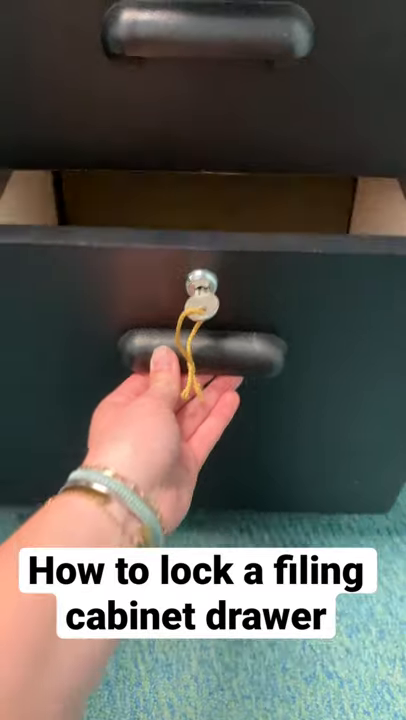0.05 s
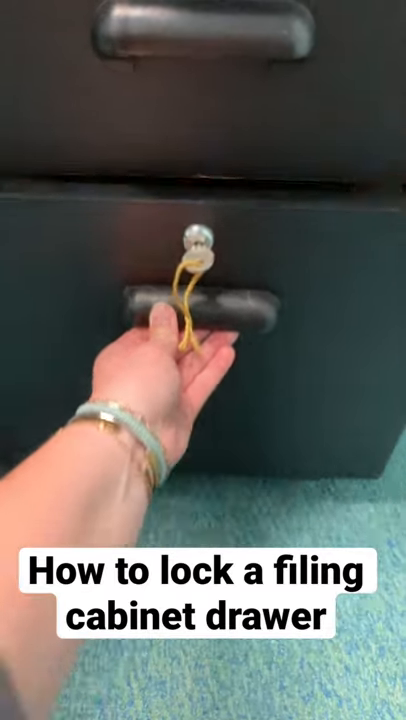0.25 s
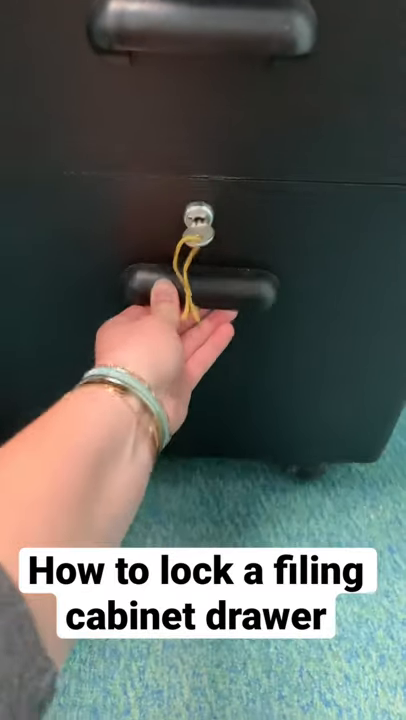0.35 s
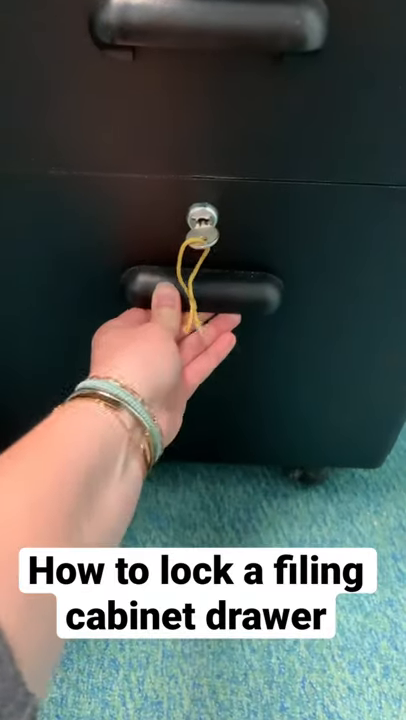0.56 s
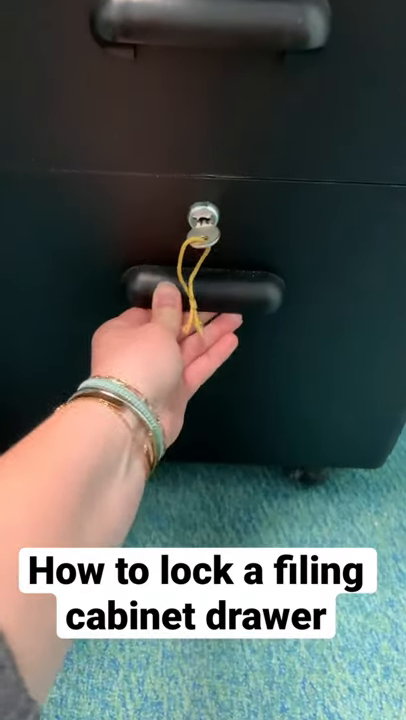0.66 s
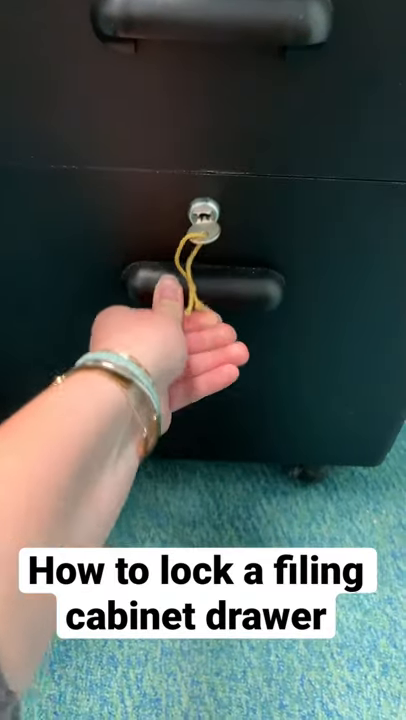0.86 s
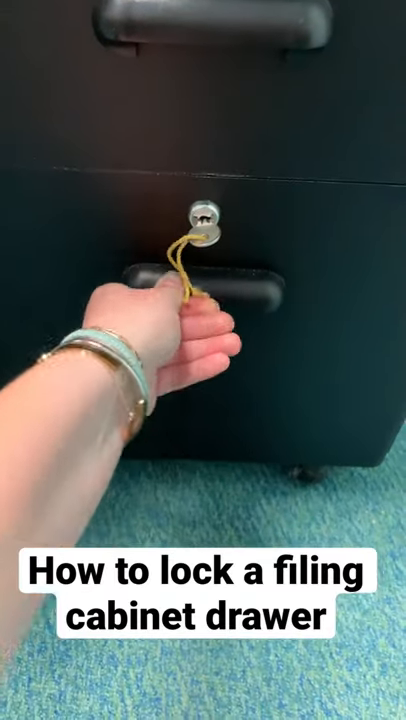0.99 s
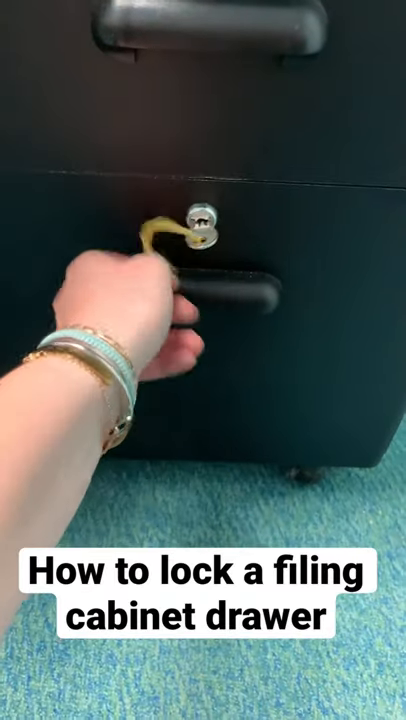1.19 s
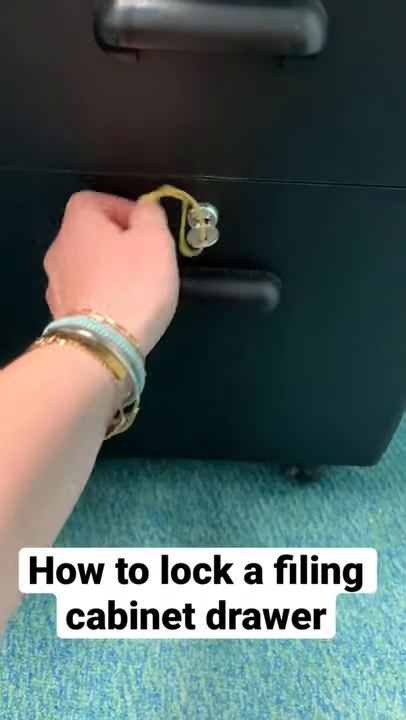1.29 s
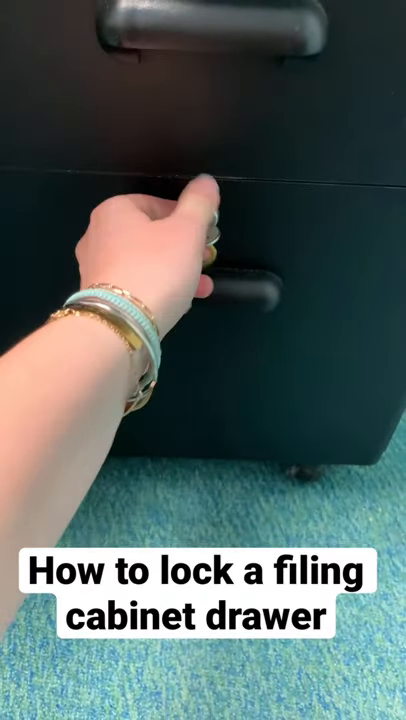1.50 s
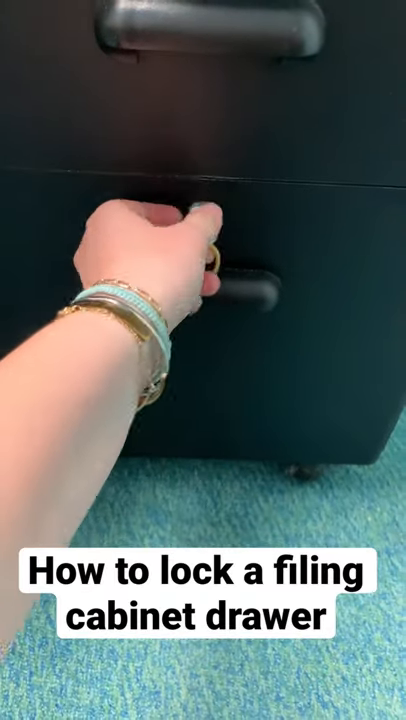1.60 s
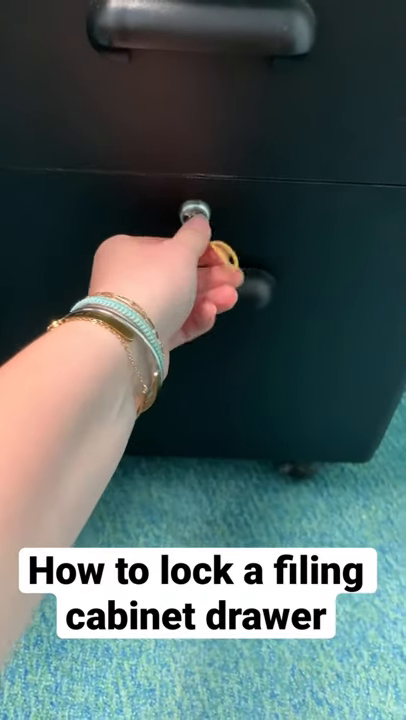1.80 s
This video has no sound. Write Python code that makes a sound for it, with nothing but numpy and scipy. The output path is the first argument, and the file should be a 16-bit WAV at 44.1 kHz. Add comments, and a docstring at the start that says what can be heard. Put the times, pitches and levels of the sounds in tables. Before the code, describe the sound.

Close stereo pickup in a quiet carpeted room: a short drawer rumble, a loud sheet-metal slam, low handling bumps and a tiny squeak, then a faint key jingle and gritty lock clicks.

```python
"""A quiet carpeted office, close to a sheet-metal cabinet, two microphone ports.
A drawer rolls shut (dense grains through box and panels) and slams; the cabinet booms and dies away.
The hand rumbles, rubs and slips off the handle with squeaks; knuckles bump the panel.
A key chinks on its ring (very high modes), then turns the lock with small gritty clicks.
Air handling hisses underneath; a short dull room tail follows every source."""
import sys
import numpy as np
from scipy import signal
from scipy.fft import rfft, irfft, next_fast_len
from scipy.io import wavfile
from scipy.ndimage import uniform_filter1d

SR = 44100
rng = np.random.default_rng(int(sys.argv[2]) if len(sys.argv) > 2 else 0)


def master_out(mix):
    """Clip the mix to full scale and print it as 16-bit PCM to the path in sys.argv[1]."""
    frames = np.transpose(np.atleast_2d(mix))
    ceiling = np.clip(frames, -1, 1)
    pcm = np.round(ceiling * 32767).astype(np.int16)
    wavfile.write(sys.argv[1], SR, pcm)


N = 81585  # length in samples

# cabinet panel modes: (frequency [Hz], level [dB], t60 [s])
CABINET_MODES = [(154, -15, .35), (182, -3.5, 0.15), (239, -8.5, 0.29), (285, -1.5, 0.056),
                 (314.2, -4, 0.05), (347.2, -10.5, 0.16), (416, -24.5, 0.45), (498, -2, 0.083),
                 (587.7, -16, 0.2), (700, -20.5, .1), (773, -13.5, 0.35), (871, -19, 0.07),
                 (1170, -28.5, 0.059), (1380, -27.5, 0.05)]
# drawer front knocking on the frame:
# (time [s], panels [dB], runners [dB], crash below the split [dB], crash above it [dB])
SLAM_KNOCKS = [(0.287, -47, -37.5, -42, -34), (0.296, -45.5, -36, -34, -34.5),
               (.300, -32, -26.5, -22.5, -19), (.304, -24, -33, -31.5, -25), (0.316, -34, -40, -40.5, -29),
               (.323, -21.5, -58, -38, -32.5), (0.342, -32.5, -40, -24, -38),
               (0.347, -31, -62.5, -30, -35.5), (0.362, -28.5, -53.5, -45, -47),
               (0.373, -40, -78, -60, -48), (.399, -36, -67, -53, -56.5), (.42, -51, -84, -45.5, -61)]
BOOM_HZ = 63.08  # whole cabinet rocking on its castors
KNOCK_T60_S = 0.1  # hollow panel knocks, from knuckles and lock


def undb(db):
    """Decibels to gain."""
    return 10 ** (np.asarray(db, float) / 20)


def unit(x):
    """Scale to rms 1."""
    return x / np.sqrt(np.mean(x ** 2))


def curve(rows, column=1):
    """Gain from a (time [s], level [dB]) table, at -120 dB outside it."""
    rows = np.array(rows)
    level_db = np.interp(np.arange(N) / SR, rows[:, 0], rows[:, column], left=-120, right=-120)
    return undb(level_db)


def over_hz(points):
    """A (frequency [Hz], value) table read at every FFT bin, on a log frequency axis."""
    points = np.array(points)
    bins_hz = np.arange(N // 2 + 1) * SR / N
    return np.interp(np.log(bins_hz + 1), np.log(points[:, 0]), points[:, 1])


def colour(x, points):
    """Shape a noise to a spectrum, rms 1."""
    return unit(irfft(rfft(x) * undb(over_hz(points)), N))


def highpass(x, hz):
    """Steep bass cut."""
    return signal.sosfilt(signal.butter(3, hz, "high", fs=SR, output="sos"), x)


def lowpass(x, hz):
    """Steep treble cut."""
    return signal.sosfilt(signal.butter(3, hz, fs=SR, output="sos"), x)


def dull(x, hz):
    """Treble cut, then rms 1."""
    return unit(lowpass(x, hz))


def band(hz, width_hz):
    """Noise in one resonance, rms 1."""
    return unit(signal.lfilter(*signal.iirpeak(hz, hz / width_hz, SR), rng.standard_normal(N)))


def even(x):
    """Noise with its random swells partly flattened, rms 1."""
    evenness = 0.53  # share of the noise's random swells that is flattened, for a steadier rumble
    swell = np.abs(signal.hilbert(x, next_fast_len(N))[:N])
    return unit(x / (swell + .1) ** evenness)


def ring(x, modes):
    """Decaying sines struck by x; a unit impulse gives each about its dB as peak."""
    out = 0
    for hz, db, t60 in modes:
        decay = np.log(1000) / (max(t60, .004) * SR)
        pole = np.exp(2j * np.pi * hz / SR - decay)
        out = out + undb(db) * signal.lfilter([1], [1, -pole], x).imag
    return out


def blows(times, db, push_s):
    """A smooth push at each time, its area set by the level."""
    x = np.zeros(N)
    np.add.at(x, (np.array(times) * SR).astype(int), undb(db))
    push = np.hanning(int(push_s * SR) + 3)
    return np.convolve(x, push / push.sum())[:N]


def bursts(times, db, length_s):
    """A short rattle of contacts at each time, rising fast and fading, its energy set by the level."""
    x = np.zeros(N)
    k = np.arange(900) / (length_s * SR)
    rattles = rng.standard_normal((len(times), 900)) * k * np.exp(-2 * k)
    for s, gain, rattle in zip(times, undb(db), rattles):
        start = int(s * SR)
        x[start:start + 900] += gain * rattle / np.sqrt(np.sum(rattle ** 2))
    return x


def fading(times, db, t60):
    """Envelope that jumps at each time and dies away."""
    decay = np.exp(-np.log(1000) / (t60 * SR))
    return signal.lfilter([1], [1, -decay], blows(times, db, 0.00054))


def swells(rows):
    """Short tones that swell and are choked: rows of (time [s], level [dB], pitch [Hz], length [s])."""
    x = np.zeros(N)
    for at, db, hz, length_s in rows:
        t = np.arange(int(length_s * SR)) / SR
        start = int(at * SR)
        x[start:start + len(t)] += undb(db) * np.hanning(len(t)) * np.sin(2 * np.pi * hz * t)
    return x


def rolling():
    """Balls bump along the runners: dense uneven grains, coloured by the box and ringing its panels."""
    # drawer on the move: (time [s], rolling level [dB], treble level [dB])
    roll_levels = [(0.0, -38.5, -58.5), (0.008, -41.5, -79), (0.062, -43.5, -78.5), (0.108, -39, -73.5),
                   (0.15, -42, -65.5), (0.158, -38.5, -73.5), (.204, -38.5, -72), (.208, -31.5, -65.5),
                   (.222, -41.5, -72.5), (0.238, -33, -70), (0.254, -34.5, -72), (0.278, -36, -68.5),
                   (0.282, -33.5, -60)]
    # body of the rolling: (frequency [Hz], density [dB per Hz])
    roll_body = [(40, -15.5), (80, 0), (200, 0), (430, 2), (640, -7), (900, -10), (1570, -19),
                 (2500, -33.5), (4000, -60.5)]
    # treble of the rolling: (frequency [Hz], density [dB per Hz])
    roll_treble = [(1500, -16), (2500, 2.5), (3500, 2), (4500, -5), (6000, -1.5), (7200, -11), (9000, -15),
                   (12000, -34.5)]
    grains_per_s, scatter_db, ring_db, stop_s = 3600, 1, -6.5, .3
    struck = rng.random(N) < grains_per_s / SR
    sizes = undb(scatter_db * rng.standard_normal(N))
    grains = struck * sizes * rng.choice([-1, 1], N)
    levels = roll_levels + [(stop_s, -38, -66), (stop_s + 0.038, -90, -110)]
    gate = curve(levels)
    hiss = curve(levels, column=2)
    panels = ring(grains * gate, CABINET_MODES) / np.std(ring(grains, CABINET_MODES))
    return colour(grains, roll_body) * gate + colour(grains, roll_treble) * hiss + undb(ring_db) * panels


def office():
    """Air handling and hiss as steady coloured noise; the middle range differs between the ports."""
    # floor of the room: (frequency [Hz], density [dB per Hz])
    floor_spectrum = [(20, -35), (32, -24), (42, -13.5), (62, -1), (90, -10), (130, -25.5), (180, -28),
                      (280, -29.5), (400, -31), (750, -41), (1100, -45.5), (2000, -48.5), (3500, -51),
                      (5500, -53), (9400, -45), (12000, -52.5), (15200, -49.5), (16500, -65)]
    # range that differs between the ports: (low edge [Hz], high edge [Hz])
    apart_hz = [490, 3660]
    floor_db, apart_db = -65, 6
    mid, side = (colour(rng.standard_normal(N), floor_spectrum) for _ in range(2))
    side = undb(apart_db) * signal.lfilter(*signal.butter(1, apart_hz, "band", fs=SR), side)
    return undb(floor_db) * (mid + side * np.array([[1], [-1]]))


def slam():
    """Each knock pushes the panels and rattles the runners into ringing; the hollow box thuds."""
    # runner steel modes: (frequency [Hz], level [dB], t60 [s])
    runner_modes = [(1164, -0.5, .03), (1394, -6, 0.03), (1618, -4, 0.038), (1870, -5, .03),
                    (2120, -3.5, .025), (2370, -7.5, 0.014), (2720, -8, .015), (2980, -7, 0.025),
                    (3165, -8, 0.024), (3510, -11.5, 0.01), (3913, -10, 0.016), (4200, -7, 0.024),
                    (4394, -14, .012)]
    # drawer box swells and is choked as it seats: (time [s], level [dB], pitch [Hz], length [s])
    box_thuds = [(.299, -24, 420, 0.018), (.302, -17, 293, 0.016), (.312, -21, 280, 0.02),
                 (.306, -29.5, 765, .03), (.342, -28, 349, .022), (.344, -38.5, 670, 0.011)]
    push_s, rattle_s = 0.0015, 0.0042
    s, panel_db, runner_db = np.array(SLAM_KNOCKS).T[:3]
    panels = highpass(ring(blows(s, panel_db, push_s), CABINET_MODES), 91)
    runners = ring(bursts(s, runner_db, rattle_s), runner_modes)
    return panels + lowpass(highpass(runners, 740), 6300) + swells(box_thuds)


def crash():
    """The rattle of each knock as fading noise; it comes from all over the cabinet, so the ports differ."""
    # rattle of the sheet metal: (frequency [Hz], density [dB per Hz])
    crack_spectrum = [(150, -11), (320, 0.5), (600, -1.5), (800, -6), (1100, -19), (1620, -16.5),
                      (2140, -31.5), (2840, -22.5), (3420, -39), (4000, -34.5), (4600, -44), (5200, -41),
                      (7750, -43), (10500, -47), (11500, -65), (13000, -67), (16000, -80)]
    split_hz, low_t60_s, top_t60_s = 2200, 0.074, 0.072
    apart_hz, apart_db = 680, -7  # the ports differ above this frequency
    s, _, _, crack_db, top_db = np.array(SLAM_KNOCKS).T
    mid, side = (colour(rng.standard_normal(N), crack_spectrum) for _ in range(2))
    noise = mid + undb(apart_db) * highpass(side, apart_hz) * np.array([[1], [-1]])
    low = signal.sosfiltfilt(signal.butter(2, split_hz, fs=SR, output="sos"), noise)
    return fading(s, crack_db, low_t60_s) * low + fading(s, top_db, top_t60_s) * (noise - low)


def boom():
    """The whole cabinet rocks on its castors: a low sine whose pitch wavers slowly."""
    # rocking: (time [s], level [dB])
    boom_level = [(.29, -54), (.315, -44), (.33, -30), (.35, -51.5), (.375, -30.5), (.4, -29.5),
                  (.425, -30), (.456, -63), (.5, -61)]
    pitch_waver = 0.017  # rms share of the pitch
    waver = uniform_filter1d(rng.standard_normal(N), size=1500)
    waver = unit(uniform_filter1d(waver, size=1500))
    phase = 2 * np.pi * np.cumsum(BOOM_HZ * (1 + pitch_waver * waver)) / SR
    return np.sqrt(2) * curve(boom_level) * np.sin(phase)


def hand_rumble():
    """A hand moving on the drawer front: evened noise in the low resonances of cabinet and panel."""
    # hand on the front: (time [s], cabinet rocking [dB], panel rumble [dB], upper rumble [dB])
    hand_levels = [(0.438, -40.5, -40, -41.5), (0.493, -45.5, -60, -57), (0.621, -60, -57.5, -58),
                   (0.682, -49, -54.5, -69.5), (0.738, -63, -66.5, -72), (0.755, -57.5, -66, -126),
                   (0.846, -58, -49.5, -51.5), (0.951, -49.5, -57, -82), (0.973, -63, -71, -79),
                   (1.05, -60.5, -72.5, -60), (1.09, -55.5, -84, -99.5), (1.127, -58, -68, -66.5),
                   (1.179, -65, -77, -105), (1.216, -71, -96, -96), (1.284, -58.5, -72, -90),
                   (1.306, -54.5, -92, -100), (1.33, -61, -102, -96), (1.375, -76, -52, -68),
                   (1.45, -53, -71, -71.5), (1.492, -68, -88, -76), (1.52, -55.5, -67, -71),
                   (1.546, -62, -83.5, -66), (1.566, -61, -96, -100), (1.637, -57.5, -81.5, -102),
                   (1.669, -68, -65, -68.5), (1.712, -59, -69.5, -94), (1.74, -57, -82, -65),
                   (1.773, -61.5, -77, -68.5), (1.818, -62, -84, -100), (1.85, -69, -93.5, -99.5)]
    # panel resonances: (frequency [Hz], width [Hz], level [dB])
    panel_rings = [(121, 13, -5), (177.8, 11, 9.5), (212.7, 49, -3.5)]
    # upper resonances: (frequency [Hz], width [Hz], level [dB])
    upper_rings = [(264.6, 17, 5.5), (363.8, 5.7, -2.5), (457, 48, -10.5), (620, 390, -13)]
    levels = [(.4, -63, -73, -67)] + hand_levels
    layers = [([(BOOM_HZ, 30, 0)], 110), (panel_rings, 260), (upper_rings, 700)]  # (rings, top Hz)
    out = 0
    for column, (rings, top_hz) in enumerate(layers, 1):
        rumble = sum(undb(db) * even(dull(band(hz, width), top_hz)) for hz, width, db in rings)
        out = out + dull(rumble, top_hz) * curve(levels, column)
    return out


def skin_rub():
    """Skin rubbing faintly on metal: one broad resonance of noise."""
    # rubbing: (time [s], level [dB])
    rub_level = [(.5, -90), (.56, -85.5), (.604, -66), (.635, -62), (.66, -68.5), (.69, -73), (.74, -81),
                 (.83, -86), (.855, -64.5), (.875, -78.5), (.95, -84), (1.33, -106.5), (1.36, -73),
                 (1.42, -73), (1.44, -79), (1.46, -75), (1.49, -72), (1.55, -80.5), (1.6, -97),
                 (1.7, -89.5), (1.73, -84), (1.8, -84.5), (1.85, -93.5)]
    rub_hz, width_hz = 1550, 500
    return highpass(band(rub_hz, width_hz), 1300) * curve(rub_level)


def handle_slip():
    """Fingers scrape along and squeak off the plastic handle, setting its modes ringing."""
    # scraping: (time [s], ring level [dB], hiss level [dB])
    scrape_levels = [(.58, -88, -99), (.61, -77, -88), (.632, -69, -69.5), (.641, -78, -57),
                     (.65, -55, -72.5), (.665, -74.5, -79), (.69, -83, -86), (.73, -97.5, -89),
                     (.8, -77.5, -89), (.84, -69, -85), (.854, -94, -71), (.872, -71, -84), (.9, -78, -82),
                     (.926, -71, -78), (.95, -99, -83.5), (1, -99, -85)]
    # finger squeaks: (time [s], level [dB], pitch [Hz], length [s])
    finger_flicks = [(.634, -53, 2060, .006), (0.639, -30.5, 2342, 0.0076), (.648, -46.5, 2070, .006),
                     (0.656, -60, 2200, 0.0071), (0.754, -67, 2410, 0.0086), (0.84, -49.5, 2214, 0.0035),
                     (0.922, -55, 2215, 0.01)]
    # partials of a squeak: (ratio to the pitch, level [dB])
    squeak_parts = [(.7, -20.5), (.84, -12), (1., 0.5), (1.17, -18.5), (1.3, -18), (1.43, -18)]
    # plastic handle modes: (frequency [Hz], level [dB], t60 [s])
    handle_modes = [(1690, -18, 0.006), (1910, -20.5, 0.033), (2174, -6, .04), (2337, -10.5, 0.038),
                    (3020, -15, 0.015), (3190, -15.5, 0.046)]
    snap_db, twang_db, hiss_hz, hiss_width_hz = -4, -32, 9400, 2500
    grit = rng.standard_normal(N) * undb(2.3 * rng.standard_normal(N))
    scrape = grit * curve(scrape_levels) / np.std(ring(grit, handle_modes))
    tones = [(at, level + part_db, ratio * hz, length_s)
             for at, level, hz, length_s in finger_flicks for ratio, part_db in squeak_parts]
    squeaks = swells(tones)
    s, db = np.array(finger_flicks).T[:2]
    snaps = bursts(s, db + snap_db, 0.0032)
    handle = ring(scrape + undb(twang_db) * squeaks + snaps, handle_modes) + squeaks
    hiss = dull(highpass(band(hiss_hz, hiss_width_hz), 7400), 9000)
    return lowpass(highpass(handle, 1400), 3100) + hiss * curve(scrape_levels, column=2)


def bumps():
    """Knuckles bump the panel: each soft push rings one hollow mode."""
    # bumps: (time [s], level [dB], pitch [Hz])
    knuckle_bumps = [(0.844, -51, 180), (0.852, -43, 200), (.84, -54, 470), (.853, -70, 470), (1, -57, 810),
                     (1.039, -63.5, 280), (0.83, -71, 750), (1.1, -70, 1400), (1.117, -53, 150),
                     (1.122, -61.5, 256), (1.12, -71, 490), (1.275, -65.5, 130), (1.28, -68.5, 470)]
    push_cycles = 0.64  # length of the push in cycles of the knock
    return sum(ring(blows([at], [db], push_cycles / hz), [(hz, 0, KNOCK_T60_S)])
               for at, db, hz in knuckle_bumps)


def key():
    """The key rattles on its ring: a gritty tick and very high rings, struck differently each time."""
    # chinks: (time [s], ring level [dB], factor on the ring time, tick level [dB], tick pitch [Hz])
    key_chinks = [(0.851, -68, .5, -53.5, 6660), (0.853, -62, .4, -56, 8000), (.858, -68, 2.6, -56, 8200),
                  (0.926, -79, 1.1, -68, 8600), (1.11, -73, 1.04, -67, 8670), (1.14, -77, 0.96, -64, 9200),
                  (1.174, -69, .6, -56.5, 9450), (1.197, -46.5, 0.59, -52.5, 7900),
                  (1.206, -68, 0.95, -65, 8500), (1.213, -66, 1.16, -66.5, 7650),
                  (1.233, -74, 1.2, -77, 8200), (1.361, -67, .9, -67, 9700)]
    # key modes: (frequency [Hz])
    mode_hz = [13220, 14070, 14330, 14780, 14950, 15300, 15460, 15590]
    # the same modes: (level [dB], t60 [s] ahead of the factor on the ring time)
    mode_db_t60 = [(-8, 0.041), (-11, .04), (-5, 0.036), (-6, 0.055), (-11, 0.042), (-7, .08), (2, .014),
                   (-5, 0.11)]
    # partials of a tick: (ratio to the tick pitch, level [dB])
    tick_parts = [(1, 0), (.85, -7), (1.15, -7), (1.3, -11)]
    scatter_db, tick_s, tick_t60_s = 1.5, 0.0021, 0.0062
    chance = rng.standard_normal((len(key_chinks), len(mode_hz)))
    out = 0
    for (at, ring_db, free, tick_db, hz), row in zip(key_chinks, chance):
        modes = [(f, db + scatter_db * c, t60 * free) for f, (db, t60), c in zip(mode_hz, mode_db_t60, row)]
        tick = [(ratio * hz, db, tick_t60_s) for ratio, db in tick_parts]
        out = out + ring(blows([at], [ring_db], 0), modes)
        out = out + ring(bursts([at], [tick_db], tick_s), tick)
    return highpass(out, 5000)


def lock():
    """Gritty clicks in the lock barrel, each with a clink of its own and a hollow knock of the panel."""
    # pins and bolt: (time [s], click [dB], brightness [dB], knock [dB], knock pitch [Hz],
    # clink [dB], clink pitch [Hz])
    lock_clicks = [(1.359, -57.5, 2, -65, 320, -74, 1740), (1.367, -70, -11, -81, 186, -66, 800),
                   (1.399, -54.5, -10, -88, 244, -59, 2240), (1.409, -70, -16, -54.5, 466, -78, 990),
                   (1.419, -66.5, -14, -65.5, 561, -77, 2200), (1.496, -51, 0.5, -78, 786, -51, 1850),
                   (1.504, -63.5, 3, -58.5, 777, -58, 2940), (1.515, -72, -10, -57, 307, -72, 2830),
                   (1.653, -68, -16, -59, 382, -58, 2210), (1.660, -75, 6, -51.5, 460, -62, 2060),
                   (1.734, -90, -3, -60, 274, -79, 1190), (1.757, -59, -5, -61, 1007, -60, 1580),
                   (1.762, -65, -15, -63.5, 798, -72, 2880), (1.769, -77, -12, -72, 1090, -72, 1410)]
    # lower lock modes: (frequency [Hz], level [dB], t60 [s])
    low_modes = [(971, -2.5, 0.046), (1410, -6, 0.015), (1588, 0, 0.022), (1836, -3.5, 0.026),
                 (2223, -4.5, 0.033)]
    # upper lock modes: (frequency [Hz], level [dB], t60 [s])
    high_modes = [(2480, -19, 0.016), (2890, -2, 0.031), (3810, -10, 0.02), (4720, 4, 0.0043),
                  (5570, -4.5, 0.0055), (6370, -14, 0.0093), (8100, -21, .005)]
    # grit in the barrel: (frequency [Hz], density [dB per Hz])
    grit_spectrum = [(300, 0), (600, 0.5), (1190, 8.5), (1590, -4), (2600, 2.5), (3260, 1), (4370, -9.5),
                     (6250, -8.5), (10500, -43), (14000, -38)]
    click_s, clink_t60_s, grit_t60_s, grit_db = 0.0032, 0.036, 0.041, -3
    pair_ratio, pair_db = 0.91, -9.5  # second mode beside each knock
    s, click_db, bright_db = np.array(lock_clicks).T[:3]
    pins = ring(bursts(s, click_db, click_s), low_modes)
    pins = pins + ring(bursts(s, click_db + bright_db, click_s / 2), high_modes)
    grit = fading(s, click_db + grit_db, grit_t60_s) * colour(rng.standard_normal(N), grit_spectrum)
    clinks, knocks = 0, 0
    for at, _, _, knock_db, knock_hz, clink_db, clink_hz in lock_clicks:
        clinks = clinks + ring(bursts([at], [clink_db], click_s / 2), [(clink_hz, 0, clink_t60_s)])
        pair = [(knock_hz, 0, KNOCK_T60_S), (pair_ratio * knock_hz, pair_db, KNOCK_T60_S)]
        knocks = knocks + ring(blows([at], [knock_db], 0.00044), pair)
    return highpass(pins + clinks, 350) + grit + knocks


def room(x):
    """A short dull tail of decaying noise, different at each port, with little bass."""
    tail_db, t60_s, dull_hz = -16, 0.13, 3340
    t = np.arange(SR // 2) / SR
    tail = rng.standard_normal((2, len(t))) * np.exp(-np.log(1000) * t / t60_s)
    tail = tail * np.minimum(t / 0.001, 1)
    tail = signal.lfilter(*signal.butter(1, [350, dull_hz], "band", fs=SR), tail)
    tail = tail / np.sqrt(np.sum(tail[0] ** 2))
    return undb(tail_db) * signal.fftconvolve(x[None], tail, axes=1)[:, :N]


def scene():
    """All sources near the microphones, with their room tail and the office floor."""
    near = rolling() + slam() + boom() + hand_rumble() + skin_rub() + handle_slip() + bumps() + key() + lock()
    wide = crash()
    return near + wide + room(near + wide.mean(axis=0)) + office()


def record(dry):
    """The two microphone ports differ in level and phase; the top is cut."""
    # lead of the left port: (frequency [Hz], phase [rad])
    port_phase = [(20, 0), (300, -.15), (1000, -.7), (1500, .3), (2200, 1.1), (2900, 1.6), (4400, 1.5),
                  (5100, 3.1), (6200, 4.5), (7600, 6.1), (9000, 6.3), (10300, 7.7), (12500, 9.4),
                  (14500, 11.4), (15300, 12.5), (20000, 12.6)]
    # left port over right: (frequency [Hz], level [dB])
    port_balance = [(60, -.4), (150, -1), (350, -1), (700, 1.3), (1300, -1), (2200, -6), (3400, 1),
                    (8000, -.5), (15000, -.4)]
    top_hz = 16000
    # each port takes half the difference, in opposite directions
    half = undb(over_hz(port_balance) / 2) * np.exp(.5j * over_hz(port_phase))
    response = np.roll(irfft(np.array([half, 1 / half]), N), 1024, axis=1)[:, :2049] * np.hanning(2049)
    ports = signal.fftconvolve(dry, response, mode="same", axes=1)
    return signal.sosfilt(signal.ellip(10, .2, 70, top_hz, fs=SR, output="sos"), ports)


dry = scene()
out = record(dry)
master_out(out)
```